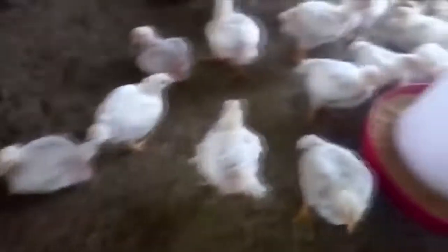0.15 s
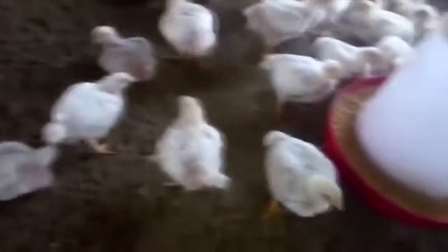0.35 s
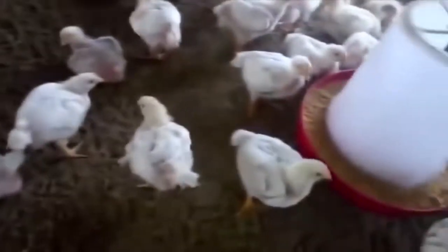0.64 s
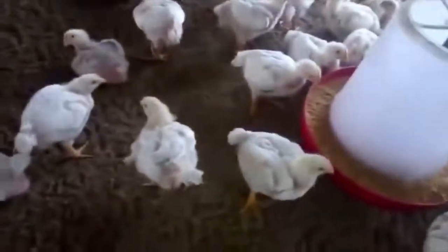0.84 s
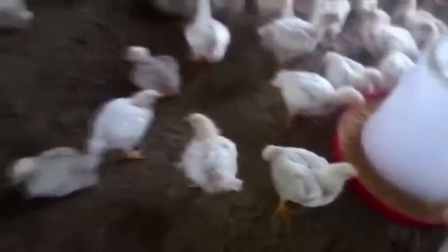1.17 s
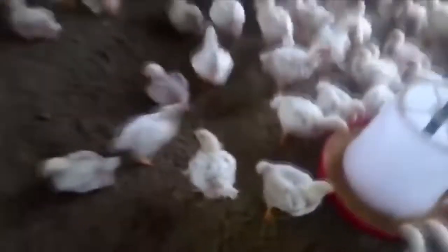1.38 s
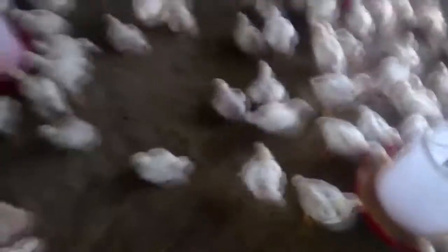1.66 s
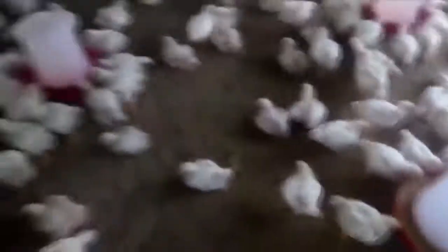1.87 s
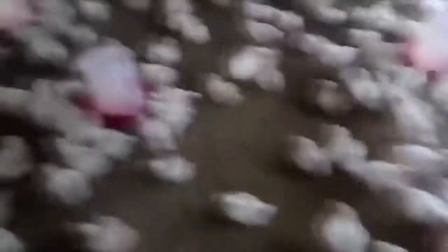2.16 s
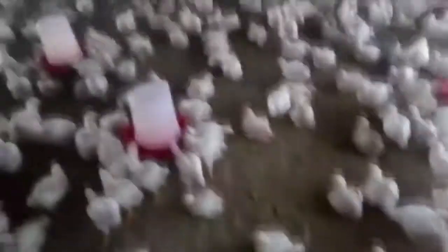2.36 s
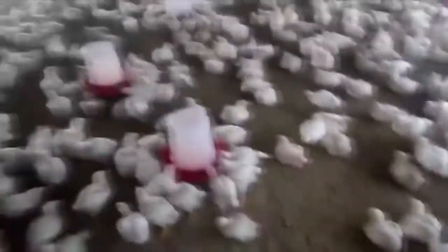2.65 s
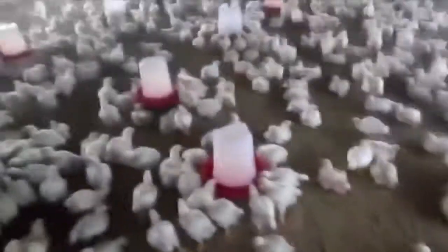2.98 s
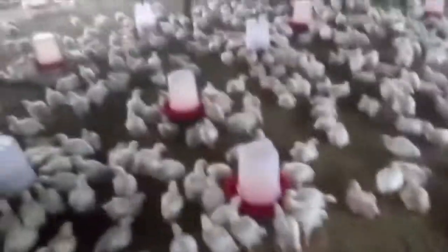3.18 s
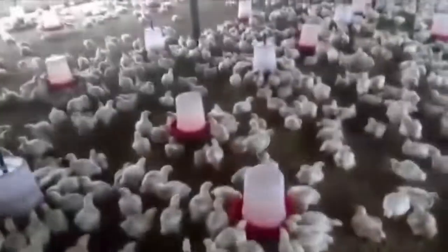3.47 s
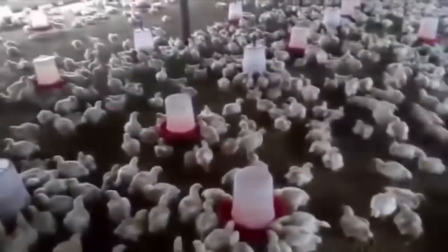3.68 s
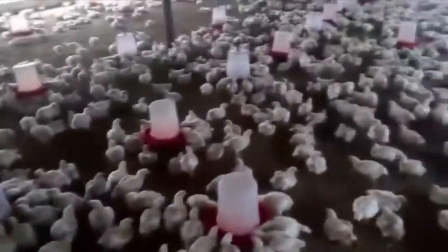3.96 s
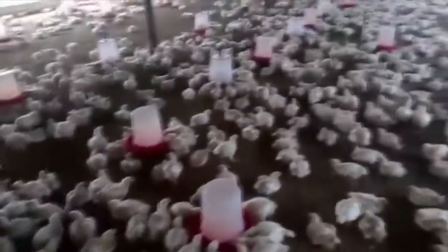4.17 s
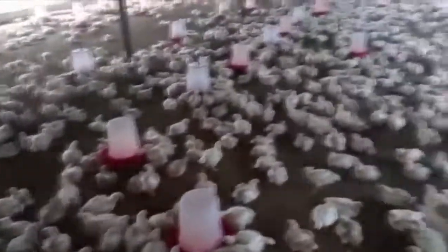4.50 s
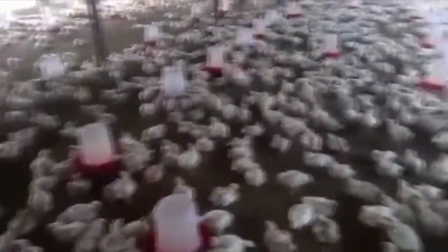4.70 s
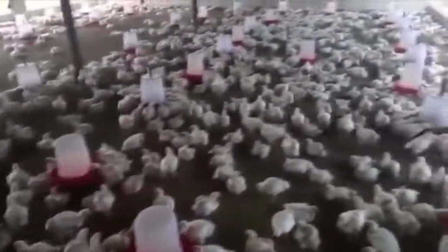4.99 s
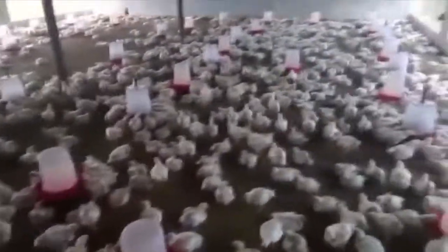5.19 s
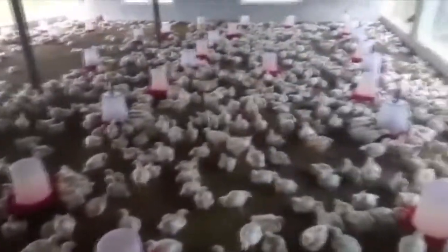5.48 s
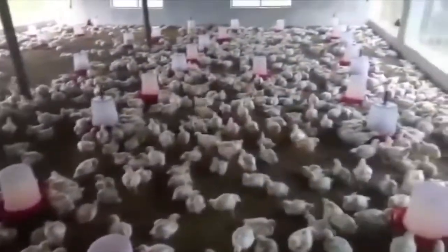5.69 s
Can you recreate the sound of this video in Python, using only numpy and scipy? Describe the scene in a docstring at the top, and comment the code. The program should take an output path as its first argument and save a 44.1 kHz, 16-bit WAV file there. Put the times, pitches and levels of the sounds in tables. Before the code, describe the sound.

Thousands of young chickens peep constantly in a farm shed, with low clucks, scratching feet and hollow knocks on plastic feeders.

```python
"""Thousands of young chickens peep in a long farm shed, heard by a phone held over the flock.
From the start, near birds stand out as falling whistles and low clucks over the blur of the crowd,
while feet scuff the litter and the shed rumbles. A quarter second in, something clatters with a thud.
Around three seconds come a few long, arching calls. From then on the scratching gets busier,
and beaks and feet knock on hollow plastic feeders, which ring briefly."""
import sys
import numpy as np
from scipy import signal
from scipy.fft import rfft, irfft, next_fast_len
from scipy.io import wavfile
from scipy.ndimage import uniform_filter1d

SR = 44100
rng = np.random.default_rng(int(sys.argv[2]) if len(sys.argv) > 2 else 0)


def transcribe(signal):
    """Save signal, clipped to [-1, 1], as a 16-bit WAV file at the path in sys.argv[1]."""
    frames = np.atleast_2d(signal).T
    limited = np.clip(frames, -1, 1)
    pcm = np.round(limited * 32767).astype(np.int16)
    wavfile.write(sys.argv[1], SR, pcm)


N = 257544

# Peeps of near birds, and the high overtones of a few: start_s, length_s, start_hz, end_hz, level_db
PEEPS_AND_OVERTONES = [(0.053, 0.055, 2370, 1692, -31), (0.092, 0.047, 2500, 2160, -31),
                       (0.103, 0.031, 3760, 3570, -47.5), (0.128, 0.04, 2447, 2040, -26),
                       (0.154, 0.084, 1950, 1810, -39.5), (.24, 0.029, 2252, 2200, -41),
                       (0.293, 0.065, 2200, 1865, -28.5), (0.303, 0.034, 2600, 2440, -49),
                       (0.427, 0.06, 2360, 2020, -39), (0.549, .029, 3050, 2453, -29.5),
                       (0.571, .016, 2400, 2105, -28), (0.578, 0.032, 4360, 4160, -54),
                       (0.593, 0.072, 2200, 2094, -31.5), (0.639, 0.05, 2088, 1890, -30),
                       (0.726, 0.047, 2390, 1760, -35), (0.74, 0.019, 3560, 2300, -53),
                       (0.788, 0.055, 2610, 2464, -31), (0.796, 0.045, 3820, 3700, -55),
                       (0.851, .016, 3450, 2550, -48.5), (0.875, .018, 3260, 2760, -49),
                       (0.868, 0.034, 2457, 1970, -20.5), (0.903, .027, 1950, 1940, -39),
                       (0.944, 0.015, 2010, 1920, -33.5), (0.936, .034, 2830, 2310, -46),
                       (1.024, 0.046, 2400, 1670, -35.5), (1.124, 0.031, 2470, 2370, -33),
                       (1.139, 0.012, 1810, 1540, -35), (1.14, .033, 3440, 3340, -47.5),
                       (1.176, 0.024, 2040, 1875, -30), (1.173, .07, 2400, 1780, -30.5),
                       (1.234, 0.058, 2340, 2070, -34.5), (1.33, 0.034, 3400, 3010, -52.5),
                       (1.344, 0.015, 2980, 2650, -47.5), (1.358, 0.034, 2457, 1695, -24),
                       (1.366, 0.068, 2410, 1940, -46), (1.432, 0.027, 2100, 1650, -35),
                       (1.445, 0.059, 2600, 1884, -30), (1.462, 0.016, 3770, 3630, -47),
                       (1.533, 0.028, 2500, 1863, -28.5), (1.587, 0.028, 2760, 2590, -34.5),
                       (1.597, 0.016, 2430, 2270, -31.5), (1.6, 0.039, 4350, 3960, -51),
                       (1.612, 0.04, 2050, 2020, -33.5), (1.619, 0.056, 3083, 2228, -36.5),
                       (1.648, .04, 4700, 4370, -50), (1.667, 0.03, 2300, 2085, -26.5),
                       (1.709, 0.014, 1870, 1660, -28), (1.723, 0.019, 2050, 1940, -34),
                       (1.731, 0.091, 2300, 1710, -34.5), (1.747, 0.038, 3250, 3060, -41),
                       (1.767, 0.05, 2500, 2133, -29.5), (1.774, 0.031, 3600, 2990, -39),
                       (1.776, 0.023, 2970, 2575, -29), (1.797, 0.011, 2420, 2150, -23.5),
                       (1.797, 0.043, 4510, 4070, -34), (1.807, 0.035, 4450, 3500, -43),
                       (1.81, .059, 2360, 1837, -29), (1.834, 0.062, 2400, 2136, -32.5),
                       (1.863, 0.069, 2590, 2390, -41), (1.904, 0.044, 2150, 1904, -30.5),
                       (1.929, 0.024, 3450, 3190, -43), (1.963, 0.031, 5400, 4370, -51),
                       (1.994, 0.031, 2300, 1990, -31.5), (1.972, 0.046, 4120, 3610, -43.5),
                       (2.06, 0.045, 2400, 2152, -30.5), (2.064, 0.019, 2690, 2420, -40),
                       (2.135, 0.058, 2530, 2310, -34), (2.184, 0.076, 2500, 2227, -27),
                       (2.226, 0.033, 2190, 2220, -28.5), (2.198, 0.1, 5130, 4360, -48.5),
                       (2.264, 0.058, 2280, 1830, -35), (2.269, 0.069, 2560, 1994, -28.5),
                       (2.308, .097, 2450, 1935, -34.5), (2.333, .125, 3444, 2820, -41),
                       (2.454, 0.073, 1720, 1666, -38.5), (2.455, .061, 2300, 1870, -32.5),
                       (2.488, .055, 5500, 4080, -49), (2.62, 0.037, 2540, 2220, -32.5),
                       (2.628, 0.028, 2260, 1710, -31), (2.641, 0.017, 1830, 1480, -35.5),
                       (2.683, 0.018, 3770, 3420, -47), (2.707, 0.046, 2664, 1930, -28),
                       (2.719, 0.13, 2690, 1787, -37.5), (2.746, 0.018, 2100, 1770, -33.5),
                       (2.91, 0.02, 2330, 2000, -31.5), (2.945, 0.12, 2313, 1886, -35),
                       (2.976, 0.08, 2900, 2200, -37.5), (3.058, .09, 2120, 1950, -49),
                       (3.078, .025, 2950, 3030, -39), (3.099, 0.016, 2470, 2000, -31.5),
                       (3.319, 0.04, 2260, 1980, -38.5), (3.443, 0.04, 2600, 2084, -41),
                       (3.509, 0.17, 2430, 2630, -48), (3.515, .096, 2100, 2566, -37.5),
                       (3.7, 0.038, 2300, 2310, -37.5), (3.738, .084, 2190, 2018, -32),
                       (3.698, 0.033, 4520, 4480, -51), (3.768, 0.12, 4320, 3700, -50.5),
                       (3.845, 0.048, 2320, 2210, -29), (3.867, 0.041, 2730, 2600, -32.5),
                       (3.873, 0.028, 2160, 1965, -29), (3.88, 0.013, 2500, 2170, -38),
                       (3.902, 0.028, 2070, 1994, -32), (3.93, 0.073, 2250, 2106, -35),
                       (3.982, 0.043, 2600, 2710, -33.5), (4.041, 0.024, 2353, 2176, -31),
                       (4.068, 0.04, 3380, 3080, -41.5), (4.156, .031, 3350, 3520, -39),
                       (4.196, 0.087, 3460, 3110, -45), (4.203, .055, 2584, 2365, -35.5),
                       (4.262, 0.016, 2210, 1990, -26.5), (4.533, 0.068, 2600, 2236, -35),
                       (4.627, 0.07, 2300, 2150, -31.5), (4.706, 0.028, 2700, 2470, -40),
                       (4.724, .063, 2230, 1955, -38), (4.808, 0.05, 2420, 1933, -33),
                       (4.814, 0.044, 2140, 1850, -37), (4.865, .049, 3000, 2620, -38),
                       (4.906, 0.018, 2460, 2110, -32), (4.911, 0.019, 2920, 2970, -37.5),
                       (5.001, .03, 2870, 2320, -37.5), (4.995, .03, 5730, 4700, -48),
                       (5.032, 0.041, 3680, 2700, -42), (5.036, 0.1, 2420, 2030, -36),
                       (5.078, .022, 5160, 4300, -49), (5.086, 0.024, 1880, 1595, -32),
                       (5.097, 0.031, 2270, 2150, -29.5), (5.14, 0.021, 2610, 2230, -37),
                       (5.185, 0.017, 2150, 2060, -35), (5.269, 0.027, 2740, 2600, -51),
                       (5.282, 0.046, 2850, 2350, -41), (5.333, 0.022, 2450, 2310, -34),
                       (5.484, 0.042, 2480, 2050, -37), (5.542, 0.042, 3460, 2900, -43),
                       (5.585, 0.053, 2030, 1925, -33.5), (5.588, 0.054, 2350, 2180, -36),
                       (5.629, 0.049, 2540, 2110, -30.5), (5.657, 0.041, 2480, 2270, -31.5),
                       (5.666, 0.011, 1860, 1900, -30.5), (5.665, 0.017, 5500, 4680, -49),
                       (5.688, 0.041, 2360, 2223, -35.5), (5.766, 0.053, 2350, 1970, -37),
                       (5.774, .07, 2800, 2306, -39)]
def peeps():
    """A chick's voice box makes an almost pure whistle that usually slides down."""
    rows = [(start_s, length_s, start_hz, start_hz + .47 * (end_hz - start_hz), end_hz, db, -40, -42)
            for start_s, length_s, start_hz, end_hz, db in PEEPS_AND_OVERTONES]
    return whistles(rows, loudest_at=.45, sharp=.82, flutter=.36, waver=.0074, swoop=.151, swoop_s=.00396)


# Long, high calls: start_s, length_s, top_hz, end_hz, level_db
ARCHING_CALLS = [(2.561, 0.16, 3366, 2700, -45.5), (3.092, 0.062, 3300, 2930, -40),
                 (3.322, 0.14, 3400, 2480, -42)]
def arching_calls():
    """A longer whistle rises a little, holds its top and then drops."""
    rows = [(start_s, length_s, .97 * top_hz, top_hz, end_hz, db, -40, -42)
            for start_s, length_s, top_hz, end_hz, db in ARCHING_CALLS]
    return whistles(rows, loudest_at=.45, sharp=.6, flutter=.31, waver=.01)


# Clucks of near birds: start_s, length_s, start_hz, end_hz, level_db, second_db (the tone an octave up)
NEAR_CLUCKS = [(0.094, 0.04, 1610, 1060, -36.5, -44), (0.63, 0.048, 974, 1006, -45.5, -26),
               (0.722, 0.034, 1770, 1560, -46, -28), (.725, 0.026, 846, 964, -47.5, 4),
               (0.759, 0.029, 1584, 1200, -41.5, -10), (0.799, 0.036, 1284, 1093, -49.5, -4),
               (1.28, 0.02, 1050, 900, -47, -25), (0.955, 0.039, 1373, 1297, -46.5, -29),
               (1.134, 0.042, 1120, 1042, -51, 15), (1.458, 0.027, 1253, 1204, -52, 17.5),
               (1.56, 0.025, 999, 970, -53.5, 22), (1.639, 0.019, 1315, 1180, -46, 11),
               (1.712, 0.022, 1460, 1260, -41, -14), (1.914, 0.033, 1480, 1390, -42.5, -30),
               (2.359, 0.025, 1035, 910, -53, -20), (2.586, 0.017, 1500, 1164, -37.5, -14),
               (2.668, .026, 925, 800, -49.5, 8.5), (2.726, 0.02, 1388, 1406, -25.5, -38),
               (3.015, 0.03, 1441, 1380, -28.5, -23), (3.198, 0.037, 1423, 1204, -38, -32),
               (3.3, 0.021, 1503, 1467, -20, -10), (3.568, 0.1, 1612, 1578, -50, -40),
               (3.614, .039, 1450, 1625, -43, -35), (3.746, 0.022, 1495, 1295, -45, -47),
               (4.304, 0.041, 1327, 1230, -41.5, -44), (4.712, 0.036, 1174, 1122, -39, 0),
               (5.1, 0.021, 1343, 1225, -34.5, -46), (5.105, 0.034, 1554, 1285, -41.5, -48),
               (5.268, 0.018, 980, 840, -44, -34), (5.612, 0.044, 1500, 1416, -40.5, -37),
               (5.786, 0.019, 1134, 1070, -39, -11), (5.798, 0.03, 1100, 823, -55, 1)]
def clucks():
    """A cluck is a lower call; stronger overtones make it throaty."""
    rows = [(start_s, length_s, start_hz, (start_hz + end_hz) / 2, end_hz, db, second, second / 2 - 19)
            for start_s, length_s, start_hz, end_hz, db, second in NEAR_CLUCKS]
    return whistles(rows, loudest_at=.35, sharp=.34, flutter=.24, waver=.0092, swoop=.17, swoop_s=.0017)


def whistles(rows, loudest_at, sharp, flutter, waver, swoop=0, swoop_s=1):
    """Each row is one gliding tone from a bird's voice box, with overtones set relative to it."""
    out = np.zeros(N + SR)
    wobbles = rng.standard_normal((len(rows), 2, 32))
    for (start_s, length_s, start_hz, mid_hz, end_hz, db, second_db, third_db), wobble in zip(rows, wobbles):
        u = np.linspace(0, 1, max(int(length_s * SR), 16))  # 0 to 1 through the call
        # every 4 ms, unsteady breath shakes the loudness and unsteady tension shakes the pitch
        breath, tension = (np.interp(u * length_s / .004, np.arange(32), w) for w in wobble)
        # a smooth curve through the three pitches, with a quick slide into it from above
        hz = start_hz * (1 - u) * (1 - 2 * u) + 4 * mid_hz * u * (1 - u) + end_hz * u * (2 * u - 1)
        hz *= 1 + swoop * np.exp(-u * length_s / swoop_s)
        phase = 2 * np.pi * np.cumsum(hz * (1 + waver * tension)) / SR
        swell = np.sin(np.pi / 2 * np.minimum(u / loudest_at, (1 - u) / (1 - loudest_at))) ** sharp
        tone = np.sin(phase) + amp(second_db) * np.sin(2 * phase)
        rich = amp(min(second_db, 0) / 2)  # a strong second harmonic brings more fourth and fifth
        tone += amp(third_db) * (np.sin(3 * phase) + rich * (np.sin(4 * phase) + np.sin(5 * phase)))
        add_at(out, start_s, amp(db) * swell * (1 + flutter * breath) * tone)
    return out[:N]


# Loudness of the far flock: time_s, level_db
CROWD_LEVELS = [(0.0, -43), (0.16, -41.5), (0.23, -51), (0.24, -52), (0.32, -29), (0.39, -55), (0.67, -44),
                (0.7, -53.5), (0.81, -35.5), (0.86, -57), (0.88, -45), (1.02, -46.5), (1.2, -39),
                (1.32, -48.5), (1.36, -39), (2.15, -38.5), (2.21, -35.5), (2.42, -39.5), (2.76, -35.5),
                (2.86, -48), (2.99, -32), (3.2, -43.5), (3.32, -38), (3.38, -48.5), (3.56, -34.5),
                (3.69, -42.5), (3.71, -33), (4.0, -36.5), (4.11, -41), (5.07, -42), (5.11, -34.5),
                (5.25, -42.5), (5.32, -34), (5.41, -45), (5.68, -38), (5.84, -43.5)]
def crowd():
    """Far peeps, with fainter shrill calls and clucks, blur together in the shed's echo."""
    middle = chorus(2280, spread=.12, scatter_db=5, second_db=-29, count=900)
    shrill = chorus(3200, spread=.18, scatter_db=4, second_db=-32, count=350)
    low = chorus(1250, spread=.22, scatter_db=1, second_db=-12.5, count=350)
    flock = middle + amp(-20) * (shrill + low)
    level_db, = curves(CROWD_LEVELS)
    return amp(level_db) * unit(flock + amp(-1) * shed_echo(flock))


def chorus(pitch_hz, spread, scatter_db, second_db, count):
    """Many birds call at random times around one pitch, mostly sliding down."""
    start_s = rng.uniform(size=count) * N / SR
    pitch, length, slope, bend, loudness = rng.standard_normal((count, 5)).clip(-2.2, 2.2).T
    hz = pitch_hz * np.exp(spread * pitch)
    length_s = .035 * np.exp(.35 * length)
    fall = length_s * (1.6 + .9 * slope)
    rows = np.transpose([start_s, length_s, hz * (1 + fall), hz * (1 + .013 * bend), hz * (1 - fall),
                         scatter_db * loudness, np.full(count, second_db), np.full(count, -36)])
    calls = whistles(rows, loudest_at=.4, sharp=1.22, flutter=.7, waver=.014, swoop=.054, swoop_s=.0031)
    return unit(calls)


# The clatter's thud, then knocks on feeders (the emptier the lower): start_s, level_db, pitch_hz
HOLLOW_KNOCKS = [(.237, -24.5, 432.7), (3.037, -47, 335), (3.13, -47, 195), (3.772, -37.5, 302),
                 (3.869, -42, 260), (4.056, -47.5, 290), (4.159, -37.5, 309), (4.331, -47, 321),
                 (4.49, -50, 334), (4.529, -48.5, 260), (4.854, -38, 187.5), (4.984, -44, 642),
                 (5.271, -37.5, 318), (5.284, -32.5, 190.5), (5.457, -47, 184), (5.713, -47.5, 186),
                 (5.796, -43, 626)]
def hollow_knocks():
    """Each knock is a low ring and a short tick; in a feeder, the air rings and the wall ticks."""
    ring_s, tick_s = .25, .16  # time to fade by 60 dB
    out, t = np.zeros(N + SR), np.arange(SR // 2) / SR
    for start_s, db, hz in HOLLOW_KNOCKS:
        # the ring is uneven, as when loose feed lies on a feeder's wall
        uneven = 1 + .45 * np.interp(t * 60, np.arange(32), rng.standard_normal(32))
        rise = 1 - np.exp(-t / .0015)
        ring = rise * amp(-60 * t / ring_s) * uneven * np.sin(2 * np.pi * hz * t)
        tick = amp(-60 * t / tick_s) * uniform_filter1d(rng.standard_normal(len(t)), size=12)
        add_at(out, start_s, amp(db) * (ring + tick))
    return out[:N]


# Hits of the clatter: start_s, level_db, length_s, treble_db (both levels compare hit with hit)
CLATTER_HITS = [(0.116, -41.5, 0.087, -8), (0.158, -38.5, 0.033, -1), (0.239, -18.5, 0.033, 12)]
# Tone of the clatter's body: frequency_hz, level_db
CLANG_TONE = [(59, -36.5), (100, -36.5), (302, 4.5), (623, -6.5), (1310, -3), (1570, -10), (2100, 4),
              (2610, -13.5), (3300, -27.5), (3890, -19), (4580, -26), (6230, -18.5), (7600, -31.5),
              (9880, -49.5), (16700, -120)]
# Tone of the crisp top, also used for scratches and scuffs: frequency_hz, level_db
CRISP_TONE = [(6000, -20), (8000, 1), (10000, 2), (12000, -6.5), (13600, -6.5)]
def clatter():
    """Rattling contacts make sudden bursts of noise that stop short."""
    body_gain, top_gain = np.zeros((2, N + SR))
    t = np.arange(SR // 4) / SR
    for start_s, db, length_s, treble_db in CLATTER_HITS:
        snap = (1 - np.exp(-t / .00074)) * (1 + .5 * np.exp(-t / .005))
        burst = amp(db - 2.5) * snap / (1 + (t / length_s) ** 4)
        add_at(body_gain, start_s, burst)
        add_at(top_gain, start_s, amp(treble_db - 40.5) * burst)
    body = noise(CLANG_TONE, patchy_db=1.5, grain_db=1.2)
    top = noise(CRISP_TONE, patchy_db=2.5, grain_db=1.5)
    return body_gain[:N] * body + top_gain[:N] * top


# Single scratches: start_s, top_db, body_db
CLAW_SCRATCHES = [(.13, -71.5, -49), (.634, -66.5, -68), (0.876, -63, -66), (1.171, -69.5, -55.5),
                  (1.642, -60.5, -57), (1.846, -51, -41), (1.971, -67.5, -61.5), (2.159, -66.5, -44),
                  (2.501, -68, -45.5), (3.018, -66, -42.5), (3.18, -61.5, -40.5), (3.253, -55, -44),
                  (3.308, -61, -48), (3.525, -72.5, -42), (3.55, -60.5, -44), (3.635, -74, -51),
                  (4.025, -63.5, -36), (4.044, -51, -43.5), (4.129, -61.5, -46), (4.162, -53, -38.5),
                  (4.208, -49.5, -42), (4.237, -52.5, -44), (4.302, -55.5, -44.5), (4.481, -50.5, -41),
                  (4.53, -58.5, -39.5), (4.741, -60.5, -49), (4.87, -67.5, -41.5), (5.019, -61, -44),
                  (5.088, -54, -41), (5.235, -58, -40.5), (5.334, -64, -42), (5.498, -74, -46),
                  (5.668, -66, -43.5), (5.81, -70, -52)]
# Tone of rubbed litter, also used for scuffs: frequency_hz, level_db
LITTER_TONE = [(300, -36), (700, -16), (1300, 11), (3000, 13.5), (4500, 8.5), (6000, 5.5), (7400, -6.5),
               (9000, -37.5)]
def scratches():
    """A claw or feather scrapes out a quick burst of bright grains over a broader hiss."""
    rise_s, fade_s = .003, .027
    top_gain, body_gain = np.zeros((2, N + SR))
    t = np.arange(SR // 8) / SR
    burst = (1 - np.exp(-t / rise_s)) * np.exp(-t / fade_s)
    for start_s, top_db, body_db in CLAW_SCRATCHES:
        add_at(top_gain, start_s, amp(top_db) * burst)
        add_at(body_gain, start_s, amp(body_db) * burst)
    top = noise(CRISP_TONE, patchy_db=5.5, grain_db=2)
    body = noise(LITTER_TONE, patchy_db=2.5, grain_db=0)
    return top_gain[:N] * top + body_gain[:N] * body


# Loudness of the scuffing: time_s, level_db
SCUFF_LEVELS = [(0.0, -55), (0.18, -69), (0.52, -60.5), (1.02, -64.5), (1.19, -77), (1.38, -69),
                (1.84, -52), (2.1, -54), (2.29, -56), (2.62, -56.5), (2.75, -57.5), (2.98, -56),
                (3.19, -49.5), (3.37, -55), (3.55, -60.5), (4.23, -44), (4.39, -44.5), (4.55, -50),
                (4.78, -51), (5.19, -54), (5.35, -55.5), (5.84, -51.5)]
def scuffing():
    """Feet and wings stir the litter on the floor into a grainy hiss with a crisp top."""
    level_db, = curves(SCUFF_LEVELS)
    hiss = noise(LITTER_TONE, patchy_db=1.5, grain_db=2.5)
    top = noise(CRISP_TONE, patchy_db=4, grain_db=-.5)
    return amp(level_db) * (hiss + amp(-20.5) * top)


# Loudness of the low sounds: time_s, rumble_db, shuffle_db
LOW_LEVELS = [(0.0, -56, -42.5), (0.05, -49, -61.5), (0.18, -50.5, -44), (0.32, -41.5, -45),
              (0.36, -54, -42.5), (0.41, -48, -48.5), (0.73, -55.5, -62.5), (0.83, -65, -67),
              (0.88, -55, -65), (1.25, -64.5, -65), (1.32, -54.5, -65), (1.61, -55.5, -65.5),
              (1.87, -52, -62), (2.65, -64, -67.5), (3.03, -53.5, -62), (3.19, -53.5, -51),
              (3.5, -53.5, -62), (3.67, -53.5, -65.5), (4.23, -59, -59), (4.26, -54.5, -52.5),
              (5.07, -57, -54), (5.17, -52, -51), (5.5, -57, -59.5), (5.84, -57.5, -58)]
# Tone of the shuffling and of the rumble: frequency_hz, level_db
SHUFFLE_TONE = [(150, -10.5), (300, 7.5), (500, 0), (800, 1.5), (1300, -0.5), (2000, -30.5)]
RUMBLE_TONE = [(12, -48), (20, -23), (70, -0.5), (91, -0.5), (150, 1.5), (184, -5.5), (242, -8.5),
               (400, -38), (520, -48), (880, -120)]
def shuffle_and_rumble():
    """Dull shuffling and the shed's deep rumble swell and fade in the bass."""
    rumble_db, shuffle_db = curves(LOW_LEVELS)
    shuffle = amp(shuffle_db) * noise(SHUFFLE_TONE, patchy_db=3.5, grain_db=-1)
    rumble = amp(rumble_db) * noise(RUMBLE_TONE, patchy_db=0, grain_db=1.1)
    return shuffle + rumble


# Tone of the microphone's hiss: frequency_hz, level_db
MIC_HISS_TONE = [(1650, -23), (2800, 4.5), (3800, -17), (4860, -23.5), (6930, -2.5), (7600, -23.5),
                 (9880, -35), (13000, -41), (16700, -120)]
def mic_hiss():
    """A faint, steady microphone hiss."""
    return amp(-67) * noise(MIC_HISS_TONE, patchy_db=-3.5, grain_db=-.5)


# Bounces off floor, feeders and roof: delay_s, level_db
FIRST_ECHOES = [(.0031, -17), (.0074, -12.5), (.0125, -14), (.019, -24), (0.028, -24.5)]
def with_first_echoes(x):
    """Nearby surfaces add late, quieter copies of the sound."""
    return x + sum(amp(db) * np.pad(x, (round(delay_s * SR), 0))[:N] for delay_s, db in FIRST_ECHOES)


# How long the shed's echo takes to fade by 60 dB: frequency_hz, fade_s
ECHO_FADES = [(150, 1.1), (500, .85), (1500, .5), (2500, .5), (5000, .25), (10000, .12)]
def shed_echo(x):
    """Sound lingers in the shed, and the high notes die first."""
    hz, t, spectrum = signal.stft(rng.standard_normal(SR), SR, nperseg=256)
    fade = amp(-60 * t / along(ECHO_FADES, hz)[:, None])
    tail = signal.istft(spectrum * fade, SR, nperseg=256)[1]
    return signal.fftconvolve(np.pad(x, (500, 0)), tail / np.linalg.norm(tail))[:N]


def noise(tone, patchy_db, grain_db):
    """Noise of strength 1 with a given tone, tiny uneven grains and louder and softer patches."""
    white = rng.standard_normal(N)
    grains = rng.exponential(size=N // 64 + 1).clip(0, 4).repeat(64)[:N]
    spectrum = signal.stft(white * amp(grain_db * grains), nperseg=512)[2]
    patches = uniform_filter1d(rng.standard_normal(spectrum.shape), size=6, axis=0)  # smooth over pitch
    patches = uniform_filter1d(patches, size=10, axis=1)  # and over time
    patchy = signal.istft(spectrum * amp(patchy_db * unit(patches)), nperseg=512)[1][:N]
    return unit(filtered(patchy, lambda hz: amp(along(tone, hz))))


def amp(db):
    """Turn decibels into a gain."""
    return 10 ** (np.asarray(db) / 20)


def unit(x):
    """Scale a sound to an average strength (rms) of 1."""
    return x / np.sqrt(np.mean(x ** 2) + 1e-20)


def add_at(track, start_s, sound):
    """Mix a sound into a track at its start time."""
    track[round(start_s * SR):][:len(sound)] += sound


def along(points, hz):
    """Read between (frequency_hz, value) points, with octaves evenly spaced."""
    point_hz, values = np.transpose(points)
    return np.interp(np.log(hz + 1), np.log(point_hz + 1), values)


def curves(rows):
    """Turn each column after the time into one value per sample."""
    time_s, *columns = np.transpose(rows)
    return [np.interp(np.arange(N) / SR, time_s, column) for column in columns]


def filtered(x, gain_at):
    """Turn each frequency up or down by gain_at(hz)."""
    size = next_fast_len(N + 8192)
    return irfft(rfft(x, size) * gain_at(np.fft.rfftfreq(size, 1 / SR)), size)[:N]


def scene():
    """Near sounds get a little of the shed's echo, the clatter more and the far crowd most."""
    near = with_first_echoes(peeps() + arching_calls() + clucks()) + hollow_knocks()
    near += amp(-15) * shed_echo(near)
    hits = clatter()
    background = crowd() + mic_hiss()
    hits += amp(-9) * shed_echo(hits)
    floor = scuffing() + shuffle_and_rumble() + scratches()
    return (near + hits + background + floor)[None]


def record(dry):
    """The phone rounds off the loudest peaks, dulls the treble and cuts the very top."""
    ceiling, dull_hz, top_hz = .24, 7700, 13600
    rounded = dry[0] / (1 + np.abs(dry[0] / ceiling) ** 4) ** .25
    dull = lambda hz: amp(-12 / (1 + (dull_hz / (hz + 1)) ** 30)) * (hz < top_hz)
    return filtered(rounded, dull)[None]


dry = scene()
out = record(dry)
transcribe(out)
```